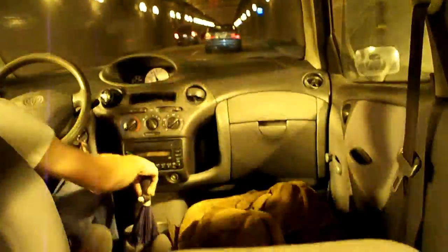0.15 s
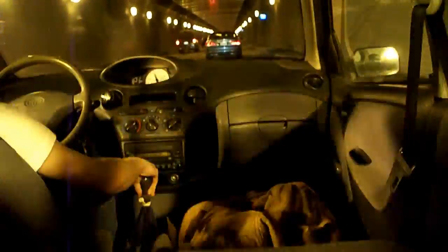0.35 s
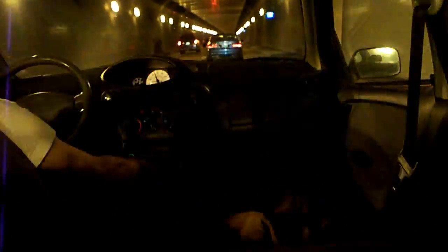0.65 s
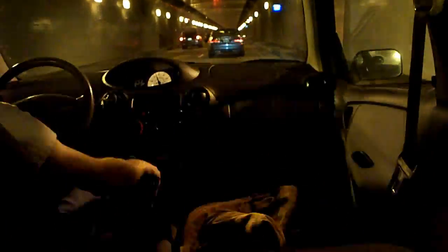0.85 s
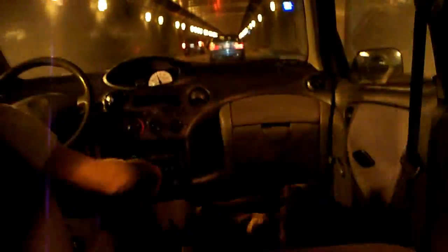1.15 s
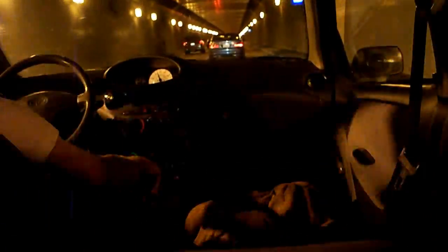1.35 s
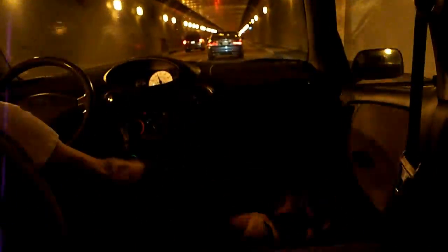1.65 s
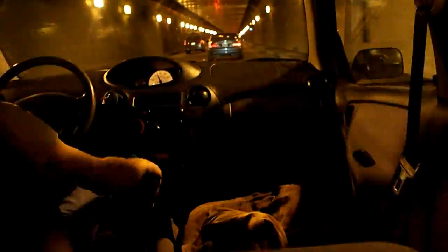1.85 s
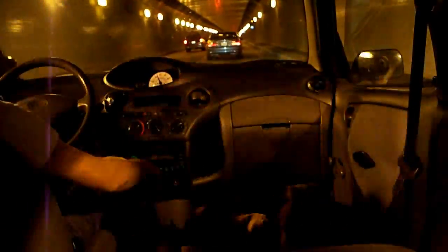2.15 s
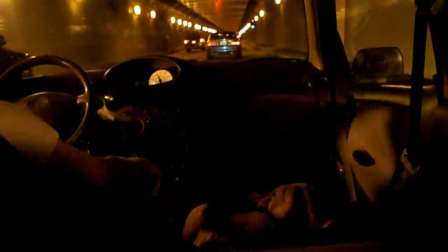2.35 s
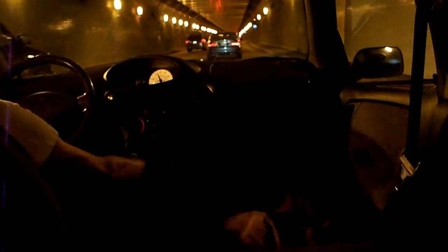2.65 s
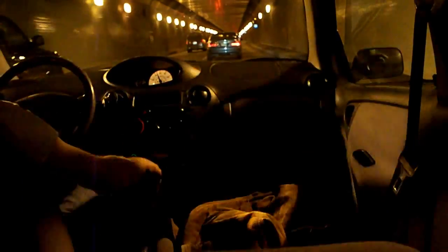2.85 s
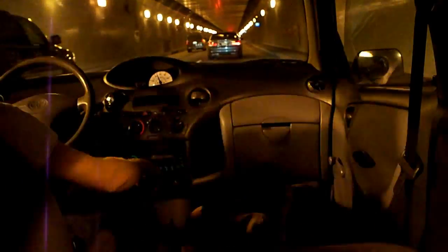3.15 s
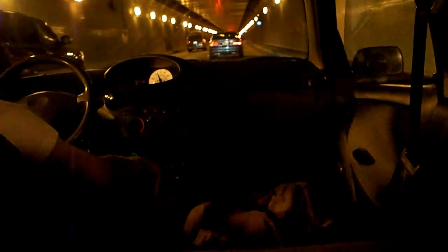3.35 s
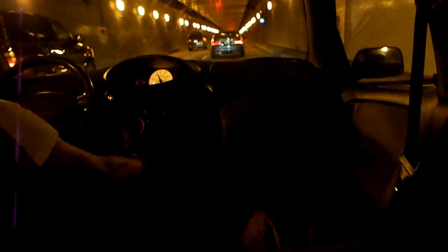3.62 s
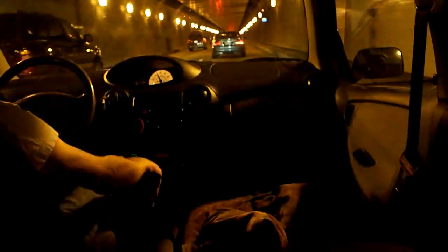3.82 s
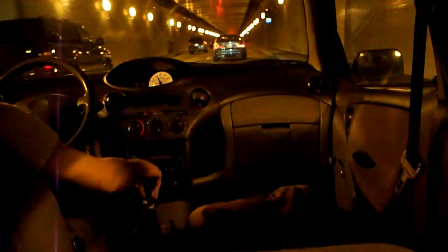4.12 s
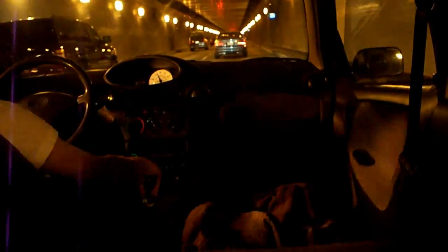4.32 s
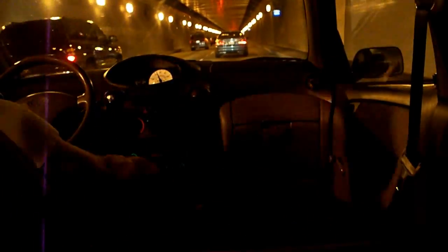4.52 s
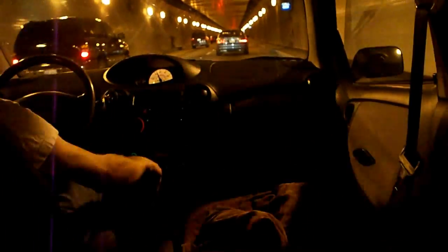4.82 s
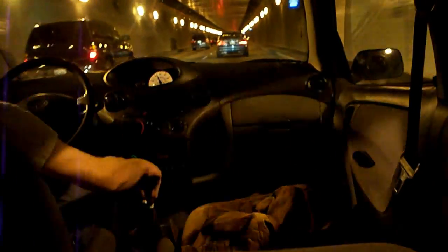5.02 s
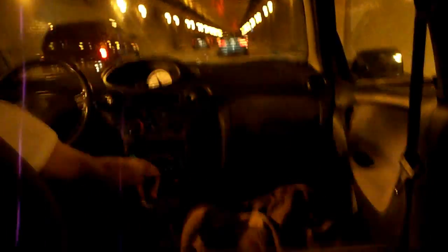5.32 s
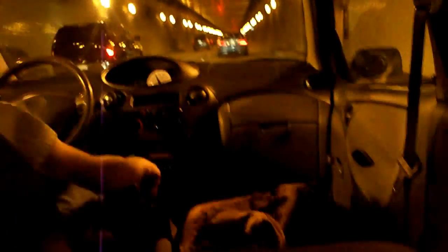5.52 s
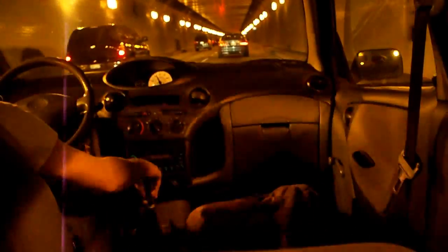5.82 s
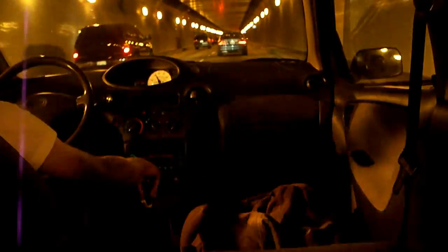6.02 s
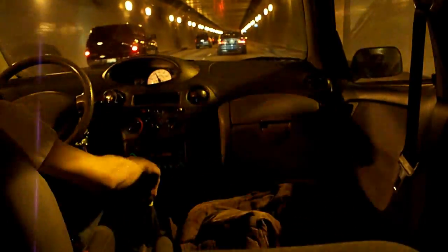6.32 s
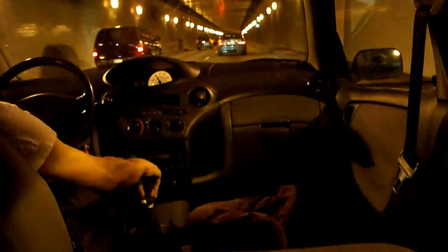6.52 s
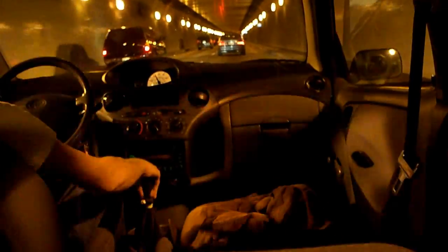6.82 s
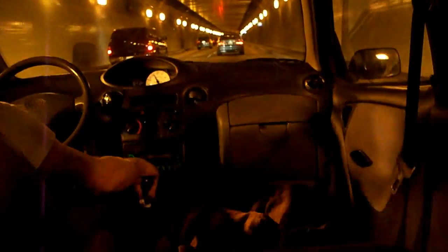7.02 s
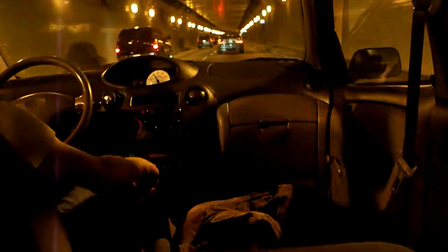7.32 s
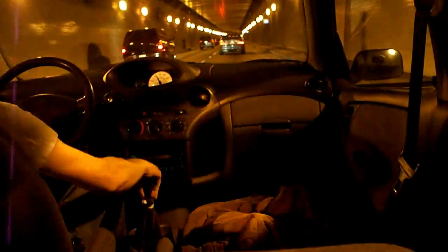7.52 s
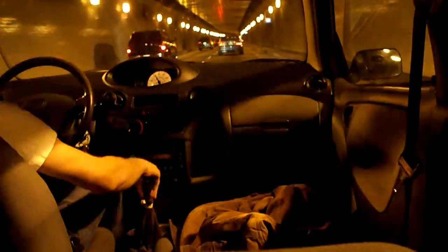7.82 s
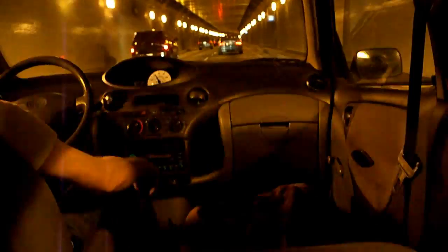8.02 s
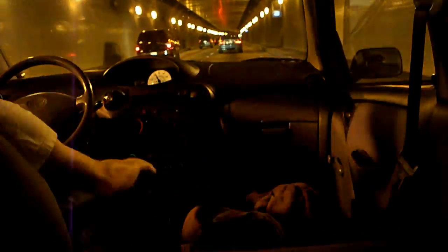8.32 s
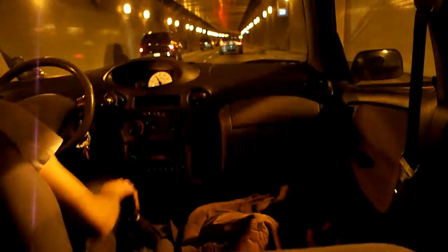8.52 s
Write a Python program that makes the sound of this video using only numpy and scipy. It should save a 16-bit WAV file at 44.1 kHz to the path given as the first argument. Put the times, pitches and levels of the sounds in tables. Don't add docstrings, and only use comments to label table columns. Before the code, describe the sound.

Boxy, muffled tyre roar and hollow drone fill a car cabin in a tunnel, broken by bumps and a burst of plastic rattling past five seconds.

```python
import sys
import numpy as np
from scipy import signal
from scipy.fft import rfft, irfft, next_fast_len
from scipy.io import wavfile
from scipy.ndimage import uniform_filter1d, map_coordinates

SR = 44100
rng = np.random.default_rng(int(sys.argv[2]) if len(sys.argv) > 2 else 0)


def log_audio(samples):
    frames = np.atleast_2d(samples).T
    limited = np.clip(frames, -1, 1)
    pcm = np.round(limited * 32767).astype(np.int16)
    wavfile.write(sys.argv[1], SR, pcm)


def amplitude_ratio(level_db):
    exponent = np.asarray(level_db, float) / 20
    return 10 ** exponent


N = 382112

# f/Hz, width/Hz, level/dB
TREAD_MODES = [(724.5, 158, 0), (906, 225, -0.5)]
# f/Hz, width/Hz, level/dB
CAVITY_MODES = [(5470, 2730, 6.5), (7500, 6600, 2)]


def unit(x):
    return x / np.sqrt(np.mean(x ** 2) + 1e-20)


def along(points):
    f, db = np.transpose(points)
    return lambda hz: amplitude_ratio(np.interp(np.log(hz + 1), np.log(f + 1), db, -120, -120))


def modes(table, order=1):
    def response(hz):
        total = 0
        for k, (centre, width, db) in enumerate(table):
            damping = 1j * hz * width
            total = total + (-1) ** k * amplitude_ratio(db) * damping / (centre * centre - hz * hz + damping)
        return total ** order
    return response


def filtered(x, response):
    m = next_fast_len(N + SR // 2)
    return irfft(rfft(x, m) * response(np.fft.rfftfreq(m, 1 / SR)), m)[:N]


def struck(blows, response):
    unit_blow = np.eye(1, N)[0]
    return filtered(blows, response) / np.abs(filtered(unit_blow, response)).max()


def wobble(rate):
    return map_coordinates(rng.standard_normal(N // 100), [np.arange(N) * rate / SR])


def rush(response, patchy_db):
    z = signal.stft(rng.standard_normal(N + 512), nperseg=512)[2]
    field = uniform_filter1d(rng.standard_normal(z.shape), size=5, axis=0)
    field = uniform_filter1d(field, size=8, axis=1)
    noise = signal.istft(z * amplitude_ratio(patchy_db * unit(field)), nperseg=512)[1][:N]
    return unit(filtered(noise, response))


def road():
    # t/s, roar level/dB
    road_work = [(0, -38), (.35, -38), (.95, -37), (1.5, -38), (2.05, -35.5), (2.6, -37), (3.0, -37),
                 (3.2, -36.5), (3.46, -33), (4.0, -36.5), (4.4, -34), (4.899, -36.5), (5.15, -36),
                 (5.75, -34), (6.2, -37), (7.0, -38), (7.9, -35.5), (8.66, -37)]
    # t/s, drone swell/dB, floor pan swell/dB
    patches = [(.12, 4.5, 7), (.77, 3, 0.5), (.86, 3.5, 0), (1.01, 6, 5), (1.25, -1, 4), (1.4, 4, 4),
               (2.06, 4, 6.5), (2.75, -1, -5), (2.85, 4.5, -2), (3.01, 7.5, 4.5), (3.47, 5.5, 3.5),
               (3.62, -3, 5), (3.75, 1, -3), (4.08, 5.5, 3), (4.22, -0.5, 1), (4.68, 5, 5), (4.99, 0, -2),
               (5.07, 3, 7), (5.33, -3, 4), (5.45, 3.5, 7), (5.9, 1.5, 2.5), (5.975, 2.5, 0),
               (6.05, 4, 5.5), (6.25, 1, 3.5), (6.39, 2.5, 3), (6.7, 2, 3.5), (7.02, -0.5, 5),
               (7.81, -1, 5), (8.0, 2.5, 0)]
    # f/Hz, level/dB
    roar_spectrum = [(200, -44.5), (300, -5.5), (450, -1), (600, -2), (1000, -3), (1300, -8.5), (1650, -6),
                     (2000, -12.5), (2600, -21.5), (3200, -31.5), (4200, -52.5)]
    # f/Hz, level/dB
    pan_spectrum = [(15, -10), (45, -11.5), (70, -7.5), (100, -1), (170, 1), (260, 0.5), (300, -12),
                    (380, -23)]
    # f/Hz, level/dB
    hiss_spectrum = [(3000, -4.5), (3600, -5.5), (4200, -8), (5000, -6.5), (5600, -5), (6500, -5),
                     (7500, -7.5), (8500, -14.5), (9300, -17), (9900, -41.5)]
    patch_s = 0.019

    t = np.arange(N) / SR
    s, db = np.transpose(road_work)
    roar_db = np.interp(t, s, db)
    mean_db = roar_db.mean()
    swing_db = roar_db - mean_db
    drone_swell, pan_swell = sum(
        np.outer(swells, np.exp(-.5 * ((t - at) / patch_s) ** 2)) for at, *swells in patches)

    drone_db = mean_db + 6.5 + 0.9 * swing_db + drone_swell
    pan_db = mean_db - 2 + 0.89 * swing_db + pan_swell
    hiss_db = mean_db - 30 + 0.98 * swing_db + .3 * pan_swell

    shake = wobble(40)
    roar = amplitude_ratio(roar_db + 0.23 * pan_swell + 3.0 + .5 * shake) * rush(along(roar_spectrum), patchy_db=1.32)
    drone = amplitude_ratio(drone_db - 1.12 + .5 * shake) * rush(modes(TREAD_MODES, order=2), patchy_db=-0.17)
    pan = amplitude_ratio(pan_db - 0.5 + 0.2 * shake) * rush(along(pan_spectrum), patchy_db=-0.5)
    hiss = amplitude_ratio(hiss_db + 1.57 + 1.5 * shake) * rush(along(hiss_spectrum), patchy_db=-0.1)
    return roar + drone + pan + hiss, roar_db


def rattle():
    # t/s, shell peak level/dB, then above it bright edge/dB, cavity/dB, bracket/dB
    strikes = [(0.0034, -27, -10, -17, -4), (0.1305, -19.5, -11, -24, -8.5), (0.159, -20, -12, -23, -6),
               (0.217, -21, -8, -27, -10), (0.2431, -20, -13, -27, -8), (0.247, -23.5, -5, -20, -2),
               (0.3226, -21.5, -23, -32, -6.5), (0.935, -31, 4.5, -19, -20), (0.9913, -23, -6, -27, 1),
               (1.0321, -21.5, -6, -27, -13), (1.068, -24, -1, -19.5, -2), (2.075, -32, -16, -18, -9),
               (3.4824, -34, -19.5, -20, 1), (5.6273, -28, -3, -27, 4), (5.7765, -22, -2, -24, 2.5),
               (5.9319, -26.5, -17, -25.5, 3), (6.0783, -26.5, -9, -23, 2), (6.783, -30, -6, -21, 1),
               (7.128, -26, -5, -21, -3), (7.138, -26.5, -1, -14, -10), (7.5933, -25, -7, -23, -4),
               (7.7611, -29, -5, -19.5, 1), (7.776, -25.5, 0, -17, -4), (8.4242, -25, -9, -30, -20)]
    # t/s, shell peak level/dB, then above it bright edge/dB,
    # cavity/dB
    further_strikes = [(1.0437, -32, -4, -14), (5.161, -31, -4, -31), (5.1927, -21.5, -10, -24),
                       (5.21, -28, -22, -17), (5.217, -26.5, -4, -15), (5.227, -31, -3, -20), (5.247, -26.5, -8, -26),
                       (5.2606, -25, 0, -19), (5.3039, -22, -7, -13), (5.3096, -22, 4, -24), (5.3365, -20.5, 0, -21),
                       (5.368, -27, 0, -10.5), (5.3744, -21, 1, -18.5), (5.4076, -25, -6, -21),
                       (5.4139, -31, -2, -17), (5.429, -26.5, -10, -20), (5.4412, -24.5, -1, -24),
                       (5.4695, -23, -6, -20), (5.476, -19.5, -4, -23.5), (5.494, -20, -5, -27),
                       (5.504, -24.5, -4, -25), (5.511, -27, -10, -24), (5.53, -35.5, -10, -18),
                       (7.134, -29, -4, -18), (7.211, -34, -6, -20), (7.6666, -29, -13, -28)]
    # f/Hz, width/Hz, level/dB
    shell_modes = [(915, 177, 3), (1626, 860, 5), (2720, 1710, -3)]
    # f/Hz, width/Hz, level/dB
    bracket_modes = [(470, 280, 0)]
    chatter_ms, cavity_extra_ms = 21, 13
    cavity_rise_s, lead_s = 0.0026, .0022
    common_bracket_db = -6.5

    shell, edge, cavity, bracket = np.zeros((4, N + SR))
    t = np.arange(2048) / SR
    for s, db, edge_db, cavity_db, knock_db in strikes + [(*row, common_bracket_db) for row in further_strikes]:
        envelope = amplitude_ratio(-60e3 * t / chatter_ms) * np.minimum(t / .0015 + 0.61, 1)
        chatter = envelope * rng.standard_normal((4, len(t)))
        chatter[1] *= np.minimum(t / cavity_rise_s, 1) * amplitude_ratio(-60e3 * t / cavity_extra_ms / 2)
        chatter *= amplitude_ratio(db) / np.linalg.norm(chatter, axis=1, keepdims=True)
        start, late = round((s + .0006) * SR), round((s + .002) * SR)
        shell[start:][:len(t)] += chatter[0] * amplitude_ratio(1.5)
        edge[start:][:len(t)] += chatter[3] * amplitude_ratio(edge_db + 0.5)
        cavity[start:][:len(t)] += chatter[1] * amplitude_ratio(cavity_db + 6)
        bracket[late:][:len(t)] += chatter[2] * amplitude_ratio(knock_db + 4.5)
        blow = round((s + lead_s) * SR)
        shell[blow] += amplitude_ratio(db + 3)
        edge[blow] += amplitude_ratio(db + edge_db)
        cavity[blow] += amplitude_ratio(db + cavity_db)

    def wall(hz):
        return modes(shell_modes, order=2)(hz) / (1 + 1j * hz / 3000 * 1.08 - (hz / 3100) ** 2) ** 2

    def sharp(hz):
        highpass = (1j * hz / (1j * hz + 2800)) ** 4
        return wall(hz) * highpass / (1 + 1j * hz / 3600 - (hz / 3300) ** 2)

    housing = struck(shell[:N], wall) + struck(edge[:N], sharp)
    inside = struck(cavity[:N], modes(CAVITY_MODES, order=3))
    return inside + housing + struck(bracket[:N], modes(bracket_modes, order=3))


def ticks(roar_db, rate, spread_db):
    # t/s, peak level/dB, push above it/dB
    clear_ticks = [(0.2601, -45.5, 17.5), (0.3304, -42.5, 26.5), (0.6619, -50, 22), (0.84, -42, 21.5),
                   (1.0212, -43.5, 23), (1.1676, -46.5, 30.5), (1.2928, -47.5, 24), (1.421, -46.5, 18),
                   (1.5929, -45.5, 28), (1.6302, -48, 22), (2.2554, -45, 31.5), (2.274, -46.5, 23),
                   (2.8397, -49, 24), (3.493, -46, 23), (3.516, -50.5, 30), (3.5244, -46.5, 22.5),
                   (3.5403, -48, 29.5), (3.685, -51, 25), (3.7742, -47, 28), (3.797, -47.5, 17),
                   (5.081, -44, 15), (5.1636, -41.5, 29.5), (5.7414, -47.5, 24), (5.8401, -43.5, 31),
                   (6.1694, -43, 30), (6.1848, -49, 28), (7.0843, -43, 28), (7.4604, -46.5, 30),
                   (7.4869, -49, 19), (7.848, -42.5, 18)]
    size = np.minimum(rng.exponential(size=N), 3)
    click = (rng.random(N) < rate / SR) * amplitude_ratio(roar_db - 20.5 + spread_db * size)
    push = click * amplitude_ratio(25)
    s, db, push_db = np.transpose(clear_ticks)
    at = np.round((s + .0012) * SR).astype(int)
    click[at] = amplitude_ratio(db + 3)
    push[at] = amplitude_ratio(db + push_db - 2.5)
    sign = np.sign(rng.standard_normal(N))
    thin = rng.random(N) < .35
    click = np.roll(click * sign, -8)

    def soft(hz):
        return np.exp(-(hz / 1200) ** 2) * hz / (hz + 150)

    full_clicks = struck(click * ~thin, modes(CAVITY_MODES, order=2))
    thin_clicks = struck(click * thin, modes(CAVITY_MODES[1:], order=3))
    return full_clicks + thin_clicks + struck(push * sign, soft)


def gain_control():
    # t/s, drop/dB
    setbacks = [(0.028, 3), (.335, 2), (1.04, 4.5), (1.081, -0.5), (1.44, 1), (2.09, 5), (3.03, -1.5),
                (3.488, 5), (3.545, 5), (4.51, 3.5), (5.383, 4), (5.51, 0), (5.985, 4), (7.15, 1.5),
                (7.63, 3.5), (8.03, 3.5)]
    step_s, recover_s = .008, 0.21
    t = np.arange(N) / SR
    drop_db = 0
    for s, db in setbacks:
        drop_db = drop_db + db * np.clip((t - s) / step_s, 0, 1) * np.exp(-np.abs(t - s) / recover_s)
    return amplitude_ratio(-drop_db)


def slips():
    gap_steps = [
        -45,
        -48,
        -55,
        -48,
        -38,
        -36.5,
        -39.5,
        -49.6,
        -50,
    ]
    first_s, every_s, drain_s = .347, .99963, 0.00028
    out, t = np.zeros(N + SR), np.arange(512) / SR
    for k, db in enumerate(gap_steps):
        start = round((first_s + k * every_s) * SR)
        out[start:][:len(t)] += amplitude_ratio(db + 18) * np.exp(-t / drain_s)
    return filtered(out[:N], lambda hz: 1 / (1 + (hz / 8000) ** 4))


def bumps():
    # t/s, peak level/dB, f/Hz
    wheel_bumps = [(0.631, -19, 143), (1.381, -21, 141), (2.067, -39, 200), (5.065, -18, 107.4),
                   (5.593, -19, 206), (6.146, -41, 180), (6.717, -43, 143), (7.579, -19, 132),
                   (8.471, -20, 149), (0.917, -18, 88.8), (5.07, -32, 106), (5.83, -21, 96.9),
                   (6.022, -22.5, 92), (6.639, -24, 98), (6.984, -19.5, 95)]
    t60_s, rise_s = 0.2, 0.024
    out, t = np.zeros(N + SR), np.arange(SR // 4) / SR
    for s, db, hz in wheel_bumps:
        envelope = amplitude_ratio(db - 3.5 - 60 * t / t60_s) * (1 - np.exp(-t / rise_s))
        out[round(s * SR):][:len(t)] += envelope * np.sin(2 * np.pi * hz * t)
    return out[:N]


def joints():
    # t/s, peak level/dB
    joint_blows = [(0.837, -12.5), (0.958, -18), (1.738, -24), (2.041, -17), (2.357, -15), (2.763, -18),
                   (3.135, -18), (3.337, -12), (3.446, -12), (3.986, -22), (4.728, -22), (5.609, -15.5),
                   (5.677, -14), (5.892, -16), (7.251, -14), (7.576, -17), (7.828, -12.5), (8.36, -21)]
    s, db = np.transpose(joint_blows)
    blows = np.zeros(N)
    blows[np.round((s - .001) * SR).astype(int)] = amplitude_ratio(db - 3.0)
    return struck(blows, modes(TREAD_MODES, order=2))


def scene():
    noise, roar_db = road()
    steady = noise * gain_control()
    knocks = rattle() + ticks(roar_db, rate=80, spread_db=4.5) + bumps() + joints()
    return (steady + knocks)[None]


def roll_off(x):
    return signal.sosfilt(signal.butter(12, 9900, fs=SR, output="sos"), x)


def record(dry):
    band_limit = lambda hz: 1 / np.sqrt(1 + (hz / 8700) ** 30)
    mix = filtered(dry[0] + slips(), band_limit)[None]
    return roll_off(mix)


dry = scene()
out = record(dry)
log_audio(out)
```